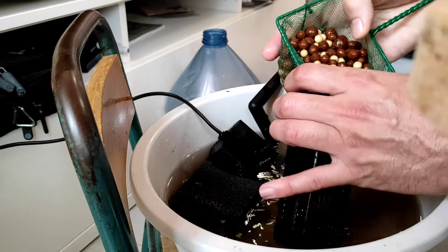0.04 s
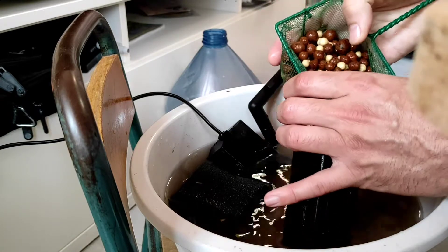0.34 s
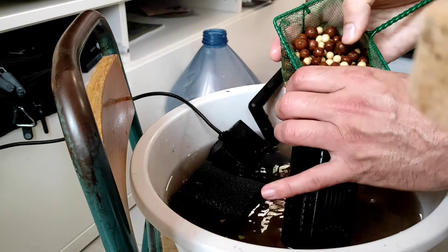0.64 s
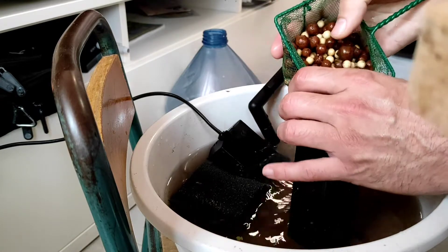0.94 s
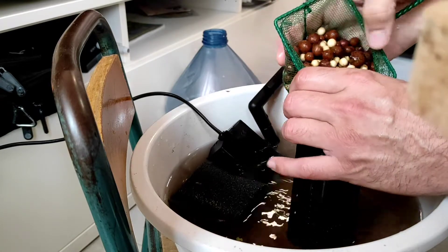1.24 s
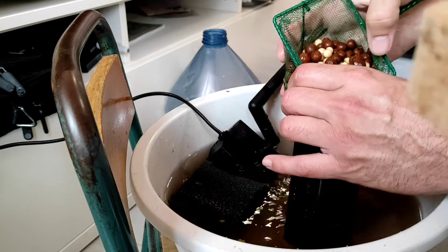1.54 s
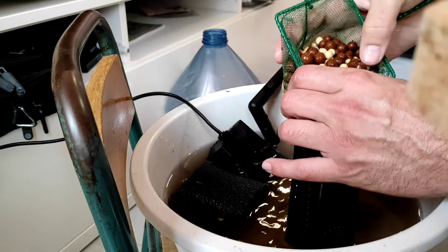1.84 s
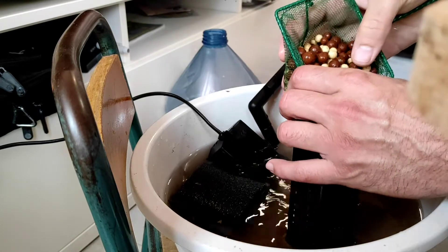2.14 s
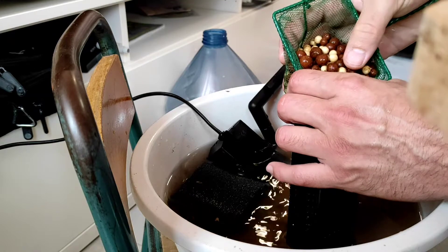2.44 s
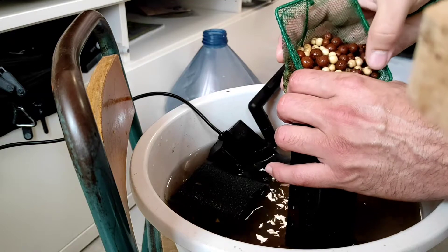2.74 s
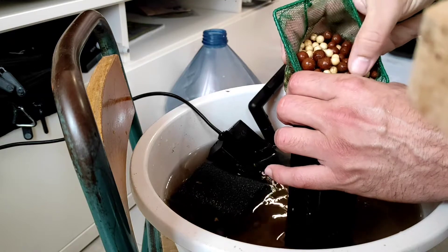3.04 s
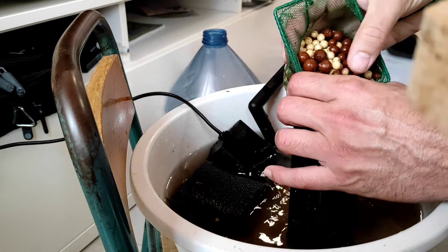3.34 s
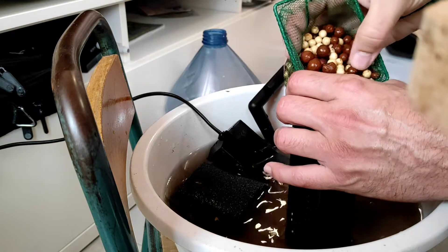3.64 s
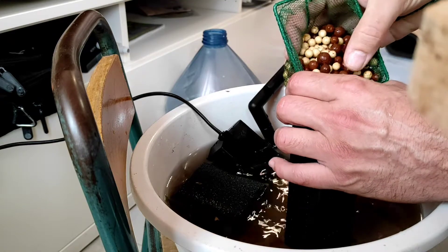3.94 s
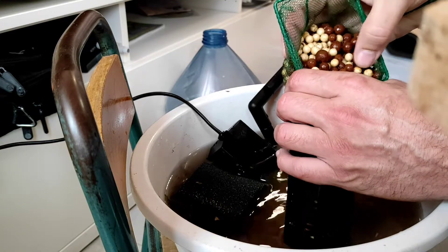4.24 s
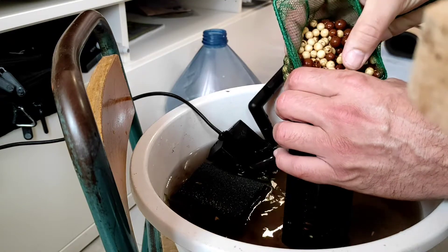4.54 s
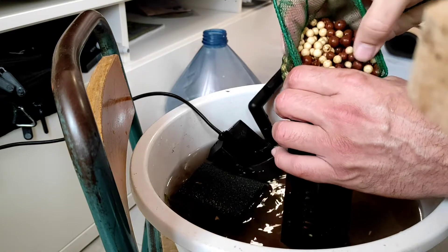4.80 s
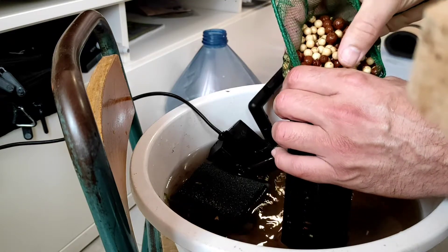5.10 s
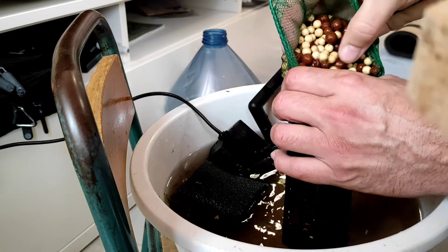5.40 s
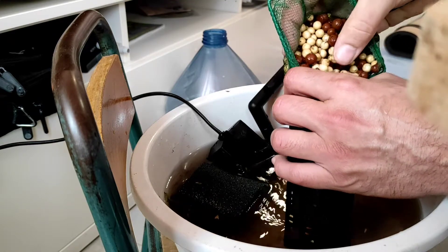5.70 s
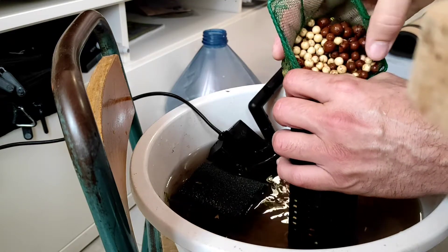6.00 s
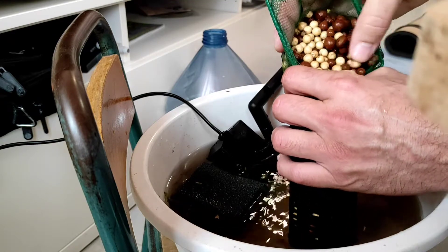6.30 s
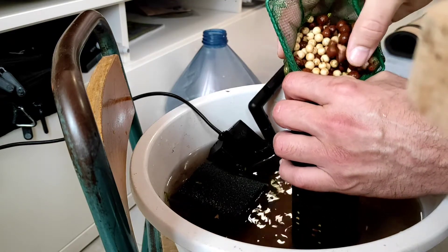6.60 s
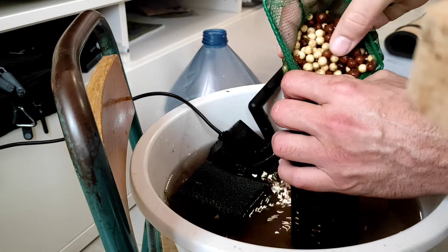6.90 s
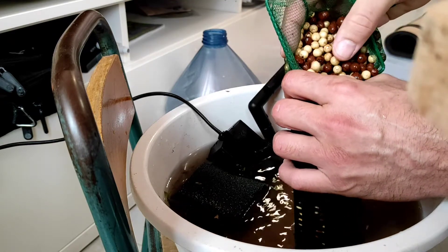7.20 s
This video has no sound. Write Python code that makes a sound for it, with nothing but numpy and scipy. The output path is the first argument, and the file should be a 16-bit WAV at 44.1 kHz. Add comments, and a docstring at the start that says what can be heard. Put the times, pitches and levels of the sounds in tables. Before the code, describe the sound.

A net rustles faintly, and from about 0.2 seconds wet ceramic balls begin dropping into a plastic filter canister. Each lands with a bright tick, a quick chatter on the pile and a short, hollow knock from the plastic. They come in uneven clumps, with a dense rattle from about 1.3 to 1.8 seconds. An occasional ball pings like glass, near 1, 1.8, 3.4 and 4.6 seconds. Between 2 and 3.2 seconds the pour thins to scattered drops and small clusters. It then picks up and runs on busily past 7 seconds, with stronger surges of clinking around 3.9, 4.6 and 5.9 seconds and brief lulls between. The net gives further soft rustles near 2.8 and 4.3 seconds. Everything is heard close up in stereo, with the short reflections of a small hard room and a very faint steady hum behind.

```python
"""Close on a plastic filter canister standing in a bucket, in a small hard room; stereo microphone.
Over a faint hum a net rustles, and wet ceramic balls jostle as a thumb pushes them out. From 0.2 s they
drop in clumps: each ticks and chatters on the pile and knocks the hollow canister, and from about 1 s
the odd one pings like glass. The pour thins between 2 and 3 s, then runs on busily past 7 s.
Near surfaces and the room answer every contact."""
import sys
import numpy as np
from scipy import signal
from scipy.fft import rfft, irfft
from scipy.io import wavfile
from scipy.ndimage import uniform_filter1d

SR = 44100
rng = np.random.default_rng(int(sys.argv[2]) if len(sys.argv) > 2 else 0)


def transcribe(signal):
    """Save signal, clipped to [-1, 1], as a 16-bit WAV file at the path in sys.argv[1]."""
    frames = np.atleast_2d(signal).T
    limited = np.clip(frames, -1, 1)
    pcm = np.round(limited * 32767).astype(np.int16)
    wavfile.write(sys.argv[1], SR, pcm)


N = 324135

# spectrum of rubbing, for both the net and the jostling balls: (frequency [Hz], relative level [dB])
RUB_SPECTRUM = [(300, -30), (700, -13), (1300, -2.5), (1900, -5), (3000, -10), (4200, -11.5), (6000, -4.5),
                (7200, -4), (7900, 5.5), (8700, -5.5), (10000, -12.5), (16000, -16.5)]


def amp(db):
    """Decibels to gain."""
    return 10 ** (np.asarray(db) / 20)


def unit(x):
    """Scales to rms 1."""
    return x / np.sqrt(np.mean(x ** 2) + 1e-20)


def strike(x, db, size=220):
    """Sets the rms level of the first five milliseconds of a blow."""
    return amp(db) * x / np.sqrt(np.mean(x[:, :size] ** 2) + 1e-20)


def read(points, hz):
    """Reads a table on a log-frequency axis."""
    f, value = np.transpose(points)
    return np.interp(np.log(hz + 1), np.log(f + 1), value)


def add(mix, start_s, sound):
    """Mixes a stereo sound in at its start time."""
    part = mix[:, max(0, round(start_s * SR)):][:, :sound.shape[1]]
    part += sound[:, :part.shape[1]]


def highpass(x, hz, order):
    """Butterworth low cut."""
    return signal.sosfilt(signal.butter(order, hz, "high", fs=SR, output="sos"), x)


def colour(x, points, share=1, size=2048):
    """Causal stereo filter whose gain follows a dB table."""
    log_gain = np.log(amp(share * read(points, abs(np.fft.fftfreq(size, 1 / SR)))))
    taps = np.fft.ifft(np.exp(np.conj(signal.hilbert(log_gain)))).real[:size // 2]
    return signal.oaconvolve(x, taps[None], axes=-1)[:, :x.shape[-1]]


def stereo_noise(same, size):
    """Left and right white noise, alike by the share same."""
    noise = rng.standard_normal((3, size))
    return np.sqrt(same) * noise[0] + np.sqrt(1 - same) * noise[1:]


def room_tone(air_db=-69, swell_db=2.5, waver_rad=0.29):
    """Air of the room, a slowly swelling rumble and a wavering hum."""
    # still air: (frequency [Hz], relative level [dB])
    air_spectrum = [(20, -7.5), (35, 11.5), (55, -8), (95, 2.5), (125, -5.5), (350, -3), (520, -13),
                    (900, -34), (3000, -16), (8000, -20.5), (16000, -44.5)]
    # hum lines: (frequency [Hz], rms level [dB])
    hum_lines = [(199, -82), (292, -83.5), (341, -83)]
    t, hz = np.arange(N) / SR, np.fft.rfftfreq(N, 1 / SR)
    air = unit(irfft(rfft(stereo_noise(0.6, N)) * amp(read(air_spectrum, hz)), N))
    rumble = irfft(rfft(air) * (hz < 50), N)
    swell = unit(sum(np.sin(2 * np.pi * (rate * t + rng.random())) for rate in np.geomspace(.2, 2, 8)))
    hum = np.zeros(N)
    for line_hz, db in hum_lines:
        waver = waver_rad * unit(uniform_filter1d(rng.standard_normal(N), 6000))
        hum += amp(db) * np.sqrt(2) * np.sin(2 * np.pi * line_hz * t + waver)
    return amp(air_db) * (air + rumble * (amp(swell_db * swell) - 1)) + hum


def net_rustle(scratchy_db=4, fizz_db=-5):
    """The mesh rubs in small catches, with a fine fizz from its threads."""
    # the net against hand and rim: (start [s], end [s], level [dB])
    rustles = [(0, 0.201, -54.5), (2.797, 2.923, -56), (4.278, 4.448, -53)]
    out = np.zeros((2, N))
    for start, end, db in rustles:
        size = round((end - start) * SR)
        catches = amp(scratchy_db * unit(uniform_filter1d(rng.standard_normal(size), 130)))
        fizz = highpass(stereo_noise(.2, size), 10000, order=4)
        rub = unit(colour(stereo_noise(0.18, size), RUB_SPECTRUM)) + amp(fizz_db) * unit(fizz)
        add(out, start, amp(db) * unit(rub * catches) * signal.windows.tukey(size, .5))
    return out


def slide_strength(rise_s=0.0036, sag_db_per_s=-11, settle_db_per_s=-220):
    """Each slide gathers quickly, loses force as it runs, then comes to rest; slides add in power."""
    # thumb pushes that set a clump sliding: (start [s], length [s], level [dB])
    slides = [(0.0, 0.24, -53), (0.778, 0.099, -41.5), (0.979, 0.031, -40), (1.14, 0.16, -52),
              (1.375, 0.14, -32.5), (1.631, 0.23, -34), (2.358, 0.031, -35.5), (2.482, 0.21, -58.5),
              (2.924, 0.054, -42), (3.092, .18, -60.5), (3.282, 0.035, -41), (3.391, 0.065, -34),
              (3.622, 0.19, -46.5), (3.782, 0.023, -36), (3.891, 0.25, -32.5), (4.23, .12, -54),
              (4.547, 0.079, -27), (4.642, 0.093, -34.5), (4.78, 0.073, -48), (4.883, 0.67, -42.5),
              (5.16, 0.049, -32.5), (5.282, 0.26, -46), (5.62, 0.24, -36), (5.882, 0.17, -27.5),
              (6.194, .16, -42), (6.42, 0.1, -52.5), (6.538, 0.27, -37.5), (6.987, 0.11, -34.5),
              (7.227, 0.064, -33.5)]
    power = np.zeros(N)
    for start, length, db in slides:
        t = np.maximum(np.arange(N) / SR - start, 0)
        fade_db = sag_db_per_s * t + settle_db_per_s * np.maximum(t - length, 0)
        power += (np.minimum(t / rise_s, 1) * amp(db + fade_db)) ** 2
    return np.sqrt(power)


def jostle(level_db=-2, usual_contacts_per_s=180, usual_slide_db=-37, crowding=.55, kinds=32):
    """Sliding balls clink and knock: crowded contacts in a strong slide, single ticks in a weak one."""
    strength = slide_strength()
    rate = usual_contacts_per_s * np.maximum(strength / amp(usual_slide_db), .45) ** crowding
    contacts = rng.random(N) < rate / SR
    impulses = amp(1.5 * np.minimum(rng.exponential(1, N), 3)) * contacts / np.sqrt(rate)
    kind, out = rng.integers(0, kinds, N), np.zeros((2, N))
    for k, bright_db in enumerate(np.linspace(-5, 5, kinds)):  # from mostly knock to mostly clink
        grain = strike(contact(RUB_SPECTRUM, rise_s=0.000048, fall_s=0.002, same=0.33, patchy_db=6), 0)
        grain += strike(clink(), bright_db - 1)
        grain += strike(knock(1300 * rng.uniform(0.802, 1.195)), -4 - bright_db)
        out += signal.oaconvolve((impulses * (kind == k))[None], grain, axes=1)[:, :N]
    return unit(out) * amp(level_db) * strength


def contact(spectrum, rise_s, fall_s, same, patchy_db, size=2048):
    """A hard contact with its own uneven colour, followed by its scatter between the canister walls."""
    t = np.arange(size) / SR
    scatter = amp(-22) * np.exp(-t / .009)
    envelope = (1 - np.exp(-(t / rise_s) ** 2)) * (np.exp(-t / fall_s) + scatter)
    hz = np.geomspace(100, SR / 2, 40)
    own_db = read(spectrum, hz) + patchy_db * rng.standard_normal(len(hz))
    return colour(stereo_noise(same, size) * envelope, np.transpose([hz, own_db]), size=1024)


def clink(decay_cycles=20, rise_s=0.00024):
    """Two wet balls meet: a few glassy partials, different for each ball; the lower ones ring longest."""
    # ceramic partials: (frequency [Hz], spread [share of frequency], relative level [dB])
    ball_modes = [(3200, 0.152, -6), (4890, 0.0764, -7), (6740, 0.063, -0.5), (7260, 0.05, 5),
                  (7800, 0.0554, 7.5)]
    t = np.arange(2048) / SR
    hz, spread, db = np.transpose(ball_modes)[:, :, None]
    own_hz = hz * np.exp(spread * rng.standard_normal(hz.shape))
    decay = amp(db) * np.exp(-own_hz * t / decay_cycles)
    partials = decay * np.sin(2 * np.pi * (own_hz * t + rng.random(hz.shape)))
    return stereo_noise(0.46, len(ball_modes)) @ partials * (1 - np.exp(-(t / rise_s) ** 2))


def knock(hz, rise_s=0.0021, fall_s=0.0029, chirp=0.99, settle_s=0.00021, ring_db=-20):
    """A few cycles of the hollow canister swell, sag in pitch, stop short and leave a weak ring."""
    t = np.arange(2048) / SR
    turns = hz * (t + chirp * settle_s * (1 - np.exp(-t / settle_s))) + rng.random()
    pulse = np.exp(-(t / fall_s) ** 2) * np.sin(2 * np.pi * turns)
    near_hz = hz * np.exp(0.1373 * rng.standard_normal((4, 1)))
    phase = rng.random((4, 1)) + 0.31 * rng.standard_normal((2, 4, 1))
    ring = np.sin(2 * np.pi * (near_hz * t + phase)).sum(1) / 2 * np.exp(-t / .008)
    return (1 - np.exp(-(t / rise_s) ** 2)) * (pulse + amp(ring_db) * ring)


def falling_balls(wall_db=-3, floor_echo_s=0.004236, floor_echo_db=-15):
    """Each ball lands and chatters; its knock returns from the canister floor and the wall rings."""
    # one row a ball: (time [s], knock level [dB], knock pitch [Hz], tick level [dB], gulp level [dB]);
    # each part of the sound is set relative to these levels
    falls = [(0.2009, -26, 1490, -38.5, -31), (0.228, -37, 1510, -45, -55),
             (0.238, -25.5, 1530, -35.5, -44), (0.279, -29, 1633, -36.5, -57), (0.317, -36, 1310, -52, -64),
             (0.344, -42, 1230, -46, -64), (0.372, -27.5, 1466, -25, -39.5), (0.431, -28.5, 1480, -27, -58),
             (0.494, -40, 1410, -50, -56), (0.5494, -22.5, 1356, -26, -41.5),
             (0.6104, -25, 1480, -35.5, -52), (0.62, -36, 1590, -39.5, -54),
             (0.7581, -19.5, 1347, -32, -61), (0.792, -36, 1380, -42, -49),
             (0.8426, -29.5, 1370, -27.5, -51), (0.874, -32, 1460, -53, -54),
             (0.9057, -20.5, 1350, -27, -45), (0.9352, -29, 1420, -22.5, -36.5),
             (0.976, -31.5, 1390, -35, -48), (0.9939, -34, 1390, -18, -40.5), (1.006, -30, 1590, -50, -62),
             (1.033, -32, 1365, -50, -63), (1.0678, -32, 1360, -32, -68), (1.157, -41, 1430, -62, -63),
             (1.199, -58, 1640, -58, -66), (1.2932, -26.5, 1310, -35.5, -52),
             (1.3282, -26.5, 1540, -25, -52), (1.3423, -25, 1310, -29, -41), (1.36, -26.5, 1340, -42, -39),
             (1.3797, -25, 1340, -29, -49), (1.396, -32, 1400, -24.5, -46), (1.4042, -29, 1180, -29, -40),
             (1.419, -30.5, 1310, -24, -41), (1.464, -33, 1360, -38, -55), (1.478, -29, 1310, -46, -55),
             (1.5015, -33, 1520, -25.5, -51), (1.53, -19.5, 1284, -27, -42.5), (1.536, -34, 1480, -24, -48),
             (1.5508, -25.5, 1310, -34, -62), (1.5956, -37, 1240, -26, -42.5),
             (1.6059, -43, 1500, -20.5, -49), (1.641, -22.5, 1340, -24, -44),
             (1.6648, -29.5, 1340, -38, -57), (1.6887, -41, 1450, -25, -54), (1.708, -26, 1340, -51, -41),
             (1.743, -22, 1310, -27.5, -46), (1.759, -27.5, 1360, -50, -45), (1.783, -32, 1180, -22, -44),
             (1.8496, -29, 1510, -26.5, -79), (1.993, -36, 1370, -44, -49.5),
             (2.178, -26.5, 1313, -34, -48), (2.2095, -33.5, 1076, -73, -43), (2.244, -46, 1390, -43, -56),
             (2.265, -24.5, 1474, -31.5, -49), (2.299, -42, 1570, -42, -66),
             (2.347, -28.5, 1380, -33, -31.5), (2.3618, -30, 1240, -26, -33.5),
             (2.374, -37, 1180, -41, -44), (2.4278, -29, 1256, -31, -41), (2.517, -52, 1260, -69, -67),
             (2.591, -47, 1280, -55.5, -64), (2.9147, -30, 1380, -28, -45), (2.94, -39.5, 1350, -32, -51),
             (3.057, -49, 1520, -46.5, -75), (3.075, -48, 1450, -49, -77), (3.262, -29, 1426, -30, -62),
             (3.2746, -29, 1330, -36, -45), (3.2944, -28, 1380, -31, -43), (3.3265, -33, 1340, -23, -49),
             (3.368, -24.5, 1284, -23.5, -47), (3.402, -56, 1310, -31, -50), (3.4218, -37, 1430, -24, -45),
             (3.43, -41, 1390, -33.5, -44), (3.5885, -20, 1284, -33.5, -53), (3.6338, -34, 1370, -27, -50),
             (3.682, -45, 1500, -33.5, -49), (3.7865, -32.5, 1370, -28.5, -44),
             (3.8032, -39, 1430, -27, -45.5), (3.8684, -37.5, 1520, -29, -50),
             (3.8888, -34, 1280, -25.5, -41), (3.9092, -33, 1400, -23.5, -46),
             (3.9215, -26, 1310, -32, -47), (3.942, -27.5, 1260, -20, -40.5),
             (3.9986, -35.5, 1190, -29.5, -43), (4.024, -38, 1300, -46, -48), (4.056, -52, 1200, -32, -53),
             (4.08, -38, 1155, -31, -52), (4.132, -30, 1094, -26.5, -36), (4.179, -36.5, 1180, -37, -57),
             (4.217, -44.5, 1250, -53, -68), (4.282, -39.5, 1350, -43, -71), (4.452, -23, 1280, -45, -69),
             (4.4607, -26, 1290, -28, -62), (4.475, -29, 1320, -36, -58), (4.518, -27, 1175, -26, -39),
             (4.5381, -26, 1350, -27.5, -45), (4.559, -26, 1430, -27, -43), (4.5775, -23.5, 1340, -28, -63),
             (4.5859, -25.5, 1340, -27, -59), (4.594, -40, 1310, -31, -48), (4.652, -31.5, 1170, -28, -44),
             (4.659, -33, 1280, -26, -40), (4.722, -56, 1460, -29, -62), (4.82, -43, 1290, -75, -62),
             (4.8599, -27, 1310, -30, -69), (4.8875, -24.5, 1280, -27.5, -50), (4.9, -34, 1200, -35, -58),
             (4.944, -23.5, 1310, -30, -64), (4.993, -44, 1300, -29, -53), (5.037, -27.5, 1340, -30, -62),
             (5.0646, -28.5, 1284, -28, -70), (5.098, -33.5, 1260, -36, -67),
             (5.124, -38, 1390, -37.5, -62), (5.1623, -29, 1310, -29.5, -58), (5.186, -29, 1310, -31, -64),
             (5.201, -40, 1350, -33, -57), (5.2679, -28, 1364, -34, -66), (5.2798, -25, 1257, -31, -67),
             (5.309, -24.5, 1295, -34.5, -55), (5.337, -33.5, 1200, -29.5, -51),
             (5.358, -38, 1270, -47, -62), (5.451, -50, 1320, -39, -86), (5.4927, -32, 1180, -21.5, -44.5),
             (5.5864, -26, 1253, -35.5, -65), (5.617, -27, 1290, -29, -45.5),
             (5.6444, -32, 1240, -27.5, -56), (5.653, -35.5, 1170, -28, -53),
             (5.697, -28.5, 1340, -31, -64), (5.7166, -31.5, 1274, -27.5, -51),
             (5.772, -24, 1340, -27.5, -64), (5.8273, -26.5, 1310, -28, -64), (5.8652, -27, 1340, -34, -54),
             (5.8731, -24.5, 1370, -29.5, -59), (5.921, -23, 1400, -21.5, -40),
             (5.932, -49, 1340, -27, -65), (5.9537, -21, 1355, -47, -59), (5.9711, -33, 1360, -27.5, -48),
             (5.99, -27.5, 1310, -40, -53), (5.995, -23, 1310, -33, -46), (6.0443, -30, 1310, -36, -43),
             (6.0484, -27, 1310, -41, -49), (6.0623, -43, 1580, -28.5, -53), (6.162, -21, 1310, -31.5, -59),
             (6.2041, -27.5, 1260, -45, -54), (6.2191, -35, 1220, -26.5, -48),
             (6.237, -35.5, 1310, -32, -65), (6.3609, -36, 1340, -35, -78), (6.426, -41, 1310, -44.5, -73),
             (6.471, -50, 1380, -45, -64), (6.512, -43, 1370, -41.5, -53), (6.542, -40.5, 1440, -30.5, -61),
             (6.5588, -30, 1300, -25.5, -60), (6.591, -43, 1310, -36, -58),
             (6.6122, -28.5, 1273, -31.5, -64), (6.6665, -30, 1266, -30, -55),
             (6.712, -31.5, 1310, -30.5, -54), (6.7437, -36, 1310, -26, -48.5),
             (6.774, -44, 1390, -26.5, -70), (6.8377, -23.5, 1310, -25.5, -47),
             (6.9375, -26.5, 1340, -25, -44), (6.9911, -31.5, 1440, -30, -45),
             (6.998, -33.5, 1300, -26, -45), (7.045, -39, 1260, -54, -56), (7.068, -36.5, 1340, -39, -44),
             (7.095, -26, 1340, -32, -44), (7.104, -39, 1100, -28, -50), (7.154, -32, 1210, -58, -48),
             (7.1947, -40, 1146, -34, -52), (7.213, -41, 1400, -37, -52), (7.248, -32, 1330, -28, -46),
             (7.286, -33.5, 1114, -32, -45)]
    # modes of the canister wall: (frequency [Hz], relative level [dB], t60 [s])
    wall_modes = [(1137, -3.5, 0.078), (1310, -32, 0.069), (1762, 2, 0.037), (2310, -15, 0.095),
                  (2867, -9.5, 0.036)]
    out, t = np.zeros((2, N)), np.arange(6000) / SR
    mode_hz, mode_db, t60 = np.transpose(wall_modes)[:, :, None]
    modes = amp(mode_db - 60 * t / t60) * np.sin(2 * np.pi * mode_hz * t) * (1 - np.exp(-t / 0.00044))
    for time, knock_db, hz, tick_db, gulp_db in falls:
        add(out, time, landing(knock_db, hz, tick_db, gulp_db))
        add(out, time + floor_echo_s, strike(knock(hz), knock_db + floor_echo_db))
        for delay, db in chatter():
            add(out, time + delay, ceramic_touch(tick_db + db))
        wall = rng.uniform(-1.29, 1, len(wall_modes)) @ modes  # the spot that is hit weights the modes
        add(out, time, amp(knock_db + wall_db) * np.tile(wall, (2, 1)))
    return out


def landing(knock_db, hz, tick_db, gulp_db, knock_share=0.63, clack_db_per_octave=22.5):
    """One ball hits the pile: the hollow knocks, the plastic clacks and thuds, the ceramic ticks."""
    # clack of the plastic: (frequency [Hz], relative level [dB])
    clack_spectrum = [(200, -36.5), (600, -33), (1100, -21.5), (1800, -3), (2500, -0.5), (3200, -3.5),
                      (4200, -10.5), (5500, -9.5), (9000, -41)]
    # dull thud of the canister body: (frequency [Hz], relative level [dB])
    thud_spectrum = [(250, -29), (430, -15.5), (600, -6), (1600, -21)]
    clack = contact(clack_spectrum, rise_s=0.0006, fall_s=0.004, same=0.31, patchy_db=4)
    thud = contact(thud_spectrum, rise_s=.0025, fall_s=.004, same=.8, patchy_db=1)
    force_db = knock_share * knock_db + (1 - knock_share) * tick_db
    clack_db = force_db - 6 + clack_db_per_octave * np.log2(hz / 1340)  # harder on a higher knock
    hollow = strike(knock(hz), knock_db - 0.5) + strike(gulp(), gulp_db - 1.5)
    plastic = strike(clack, clack_db) + strike(thud, gulp_db - 7.5)
    return hollow + plastic + ceramic_touch(tick_db) + snap(tick_db - 11)


def gulp(low_hz=720, sag_hz=500, settle_s=0.0034, rise_s=0.0025, fall_s=0.0054):
    """The lowest waves travel slowest in the column, so a deep knock sinks towards its lowest pitch."""
    t = np.arange(2048) / SR
    turns = low_hz * rng.uniform(0.897, 1.097) * t + sag_hz * settle_s * (1 - np.exp(-t / settle_s))
    envelope = (1 - np.exp(-(t / rise_s) ** 2)) * np.exp(-t / fall_s)
    return np.tile(envelope * np.sin(2 * np.pi * turns), (2, 1))


def ceramic_touch(db):
    """Ceramic on ceramic: some touches are a dry tick, others more of a glassy clink."""
    # dry tick: (frequency [Hz], relative level [dB])
    tick_spectrum = [(1500, -24.5), (3500, -24), (4800, -7), (6200, -1.5), (7200, 1.5), (7900, 13),
                     (8700, -15.5), (10000, -8.5), (16000, -26.5)]
    tick = contact(tick_spectrum, rise_s=0.0002, fall_s=0.003, same=0.16, patchy_db=4.5)
    glassy_db = 3 * rng.uniform(-0.97, 1)
    return strike(tick, db - 3 - glassy_db / 2) + strike(clink(), db - 5 + glassy_db)


def snap(db, spread_db=4, fall_s=.0014, size=2048):
    """The instant of contact: a tiny bright crack, louder for some balls than for others."""
    crack = stereo_noise(.3, size) * np.exp(-np.arange(size) / SR / fall_s)
    own_db = db + spread_db * np.clip(rng.standard_normal(), -1, 1)
    return strike(highpass(crack, 10000, order=4), own_db)


def chatter(graze_s=0.0022, graze_db=-12, flight_s=0.008, rebound_db=-11, loss_db=-3, bounces=3):
    """A ball grazes a neighbour, lands and rebounds unevenly: (delay [s], relative level [dB])."""
    delays = np.cumsum(flight_s * 2 ** rng.uniform(-2, 1, bounces))
    levels = rebound_db + loss_db * (np.arange(bounces) + rng.uniform(-0.48, 1, bounces))
    return [(-graze_s * rng.random(), graze_db), *zip(delays, levels)]


def glassy_pings(gain_db=2, split=0.042, partials=4):
    """A loose ball pings; it is not quite round, so its partial splits into a rough cluster."""
    # balls that ring out: (time [s], pitch [Hz], relative level [dB])
    pings = [(0.992, 3200, -35), (1.064, 3510, -41), (1.847, 5190, -41), (3.422, 4770, -39),
             (3.43, 5300, -56), (4.559, 5000, -39), (4.661, 4660, -39)]
    out, t = np.zeros((2, N)), np.arange(3000) / SR
    envelope = (1 - np.exp(-t / .0006)) * np.exp(-t / .007)
    for time, hz, db in pings:
        own_hz = hz * (1 + split * rng.uniform(-0.73, 1, (partials, 1)))
        weights = stereo_noise(0.8, partials)
        cluster = weights @ np.sin(2 * np.pi * (own_hz * t + rng.random((partials, 1))))
        add(out, time, strike(envelope * cluster, db + gain_db))
    return out


def open_top_octave(x, from_hz=10000, start_db=-6, end_db=4, full_s=3.8):
    """The top octave starts dull, opens up by about 4 s, then holds."""
    hz = np.fft.rfftfreq(N, 1 / SR)
    top = irfft(rfft(x) * (1 - 1 / (1 + (hz / from_hz) ** 20)), N)
    top_db = np.interp(np.arange(N) / SR, [0, full_s], [start_db, end_db])
    return x + top * (amp(top_db) - 1)


def near_echoes(x):
    """Small hard surfaces close by throw the treble back to the opposite side."""
    # first reflections: (delay [s], gain [dB])
    reflections = [(0.011, -12), (0.0137, -16.5)]
    out, treble = np.zeros((2, N)), highpass(x, 3000, order=2)
    for delay, db in reflections:
        add(out, delay, amp(db) * treble[::-1])
    return out


def room_reverb(x, build_s=0.0011, gap_s=0.001, slot_samples=12):
    """Sparse reflections of the small room build up and die away, each band at its own speed."""
    # decay of the room: (frequency [Hz], t60 [s])
    decay_times = [(400, 1.01), (1100, 0.3), (2800, 0.48), (7400, 0.53), (14000, 0.45)]
    # strength of the tail: (frequency [Hz], gain [dB])
    tail_gain = [(750, -7), (1300, -7), (2800, -4), (7400, -6.5), (14000, -10.5)]
    slots = np.arange(0, SR - slot_samples, slot_samples)
    arrivals = slots + rng.integers(0, slot_samples, (2, len(slots)))
    taps = np.zeros((2, SR))
    np.put_along_axis(taps, arrivals, rng.choice([-1., 1.], arrivals.shape), 1)
    taps *= 1 - np.exp(-np.maximum(np.arange(SR) / SR - gap_s, 0) / build_s)
    hz, t, bands = signal.stft(taps, SR, nperseg=256)
    tail = signal.istft(bands * amp(-60 * t / read(decay_times, hz)[:, None]), SR)[1]
    tail = colour(tail / np.linalg.norm(tail[0]), tail_gain)
    return signal.oaconvolve(x, tail, axes=1)[:, :N]


def scene():
    """The pour up close, the room answering it and the room tone behind."""
    pour = falling_balls() + jostle() + glassy_pings() + net_rustle()
    direct = open_top_octave(pour)
    direct = highpass(direct, 400, order=2)  # the small canister radiates no bass
    return direct + near_echoes(direct) + room_reverb(direct) + room_tone()


def record(dry):
    """A stereo microphone with two ports of unlike colour, a dull top octave and a band limit."""
    # left port minus right port: (frequency [Hz], gain [dB])
    port_balance = [(60, 5), (380, 7), (700, 2), (1300, 2), (2400, -3), (4000, 0), (5600, -2), (7000, -7),
                    (8200, -1.5), (15000, 0.5)]
    # response common to both ports: (frequency [Hz], gain [dB])
    mic_response = [(100, 2.5), (8600, -1), (9200, -0.5), (9900, -10), (12000, -14), (16000, -19.5)]
    left = colour(dry[:1], port_balance, share=.5)
    right = colour(dry[1:], port_balance, share=-.5)
    picked_up = colour(np.vstack([left, right]), mic_response)
    band_limit = signal.firwin(511, 16400, window=("kaiser", 9), fs=SR)
    return signal.oaconvolve(picked_up, band_limit[None], "same", axes=1)


dry = scene()
out = record(dry)
transcribe(out)
```